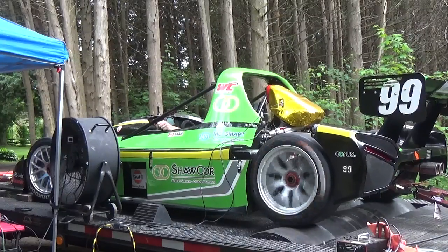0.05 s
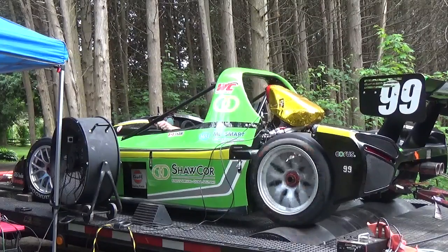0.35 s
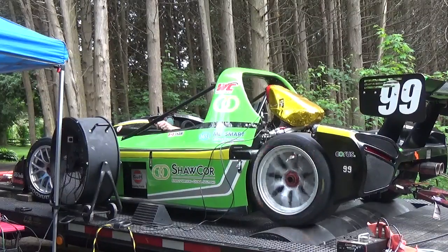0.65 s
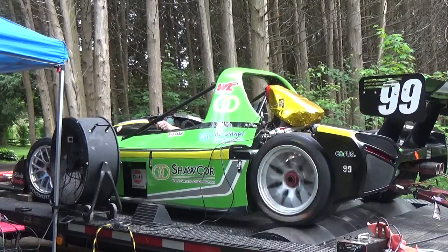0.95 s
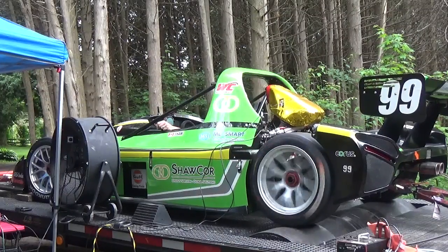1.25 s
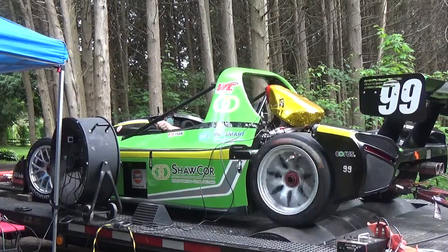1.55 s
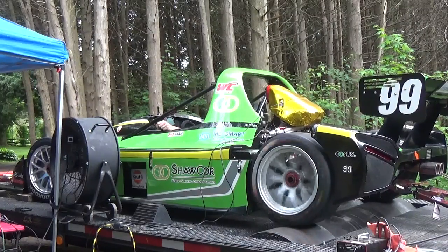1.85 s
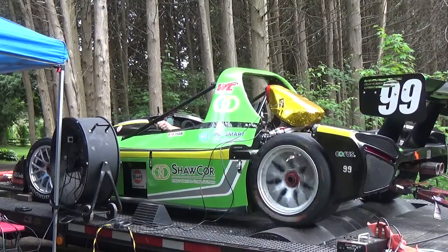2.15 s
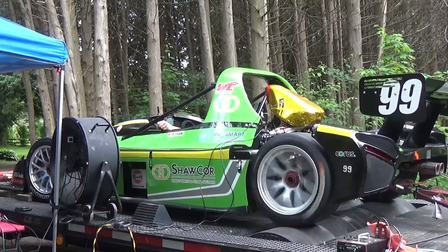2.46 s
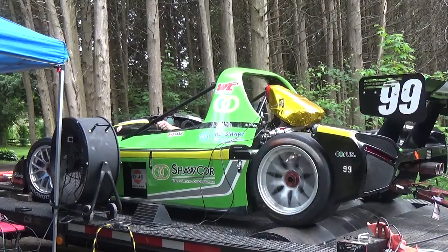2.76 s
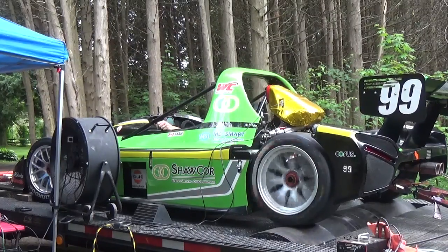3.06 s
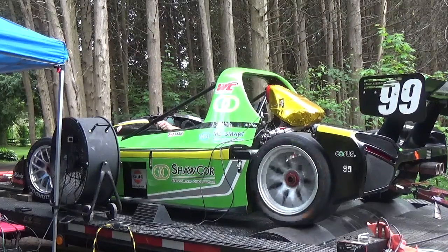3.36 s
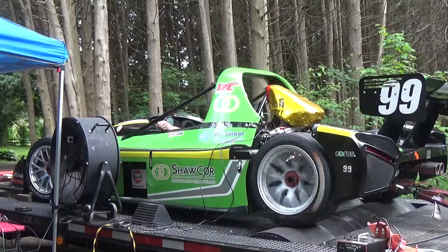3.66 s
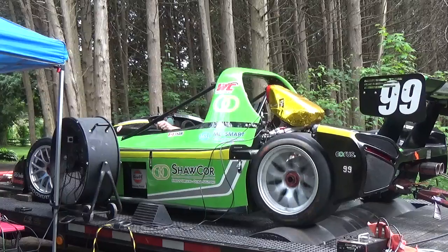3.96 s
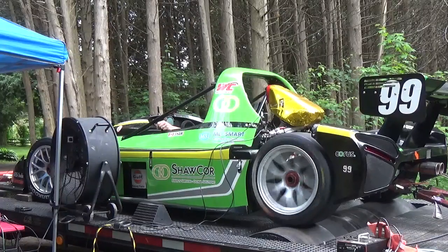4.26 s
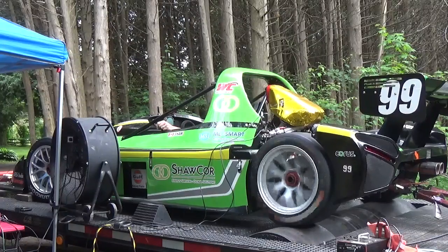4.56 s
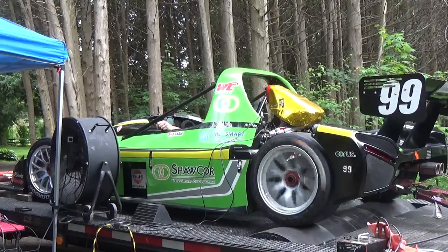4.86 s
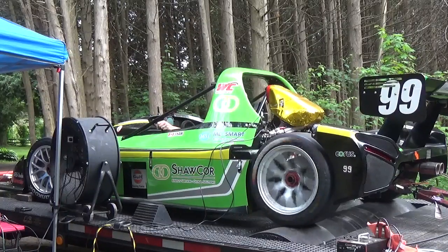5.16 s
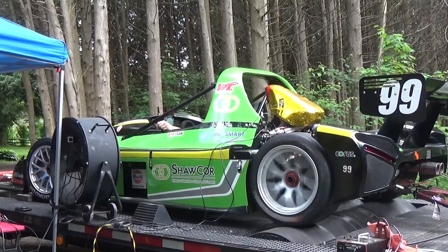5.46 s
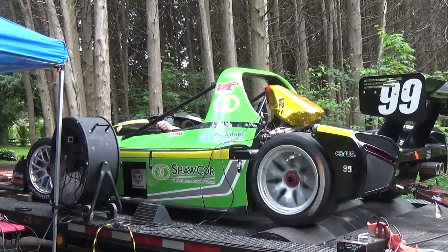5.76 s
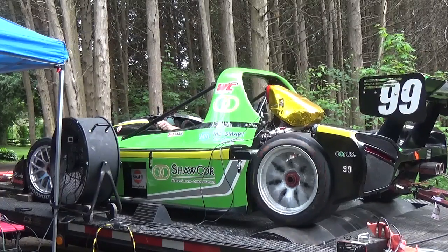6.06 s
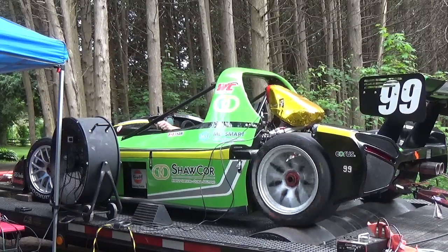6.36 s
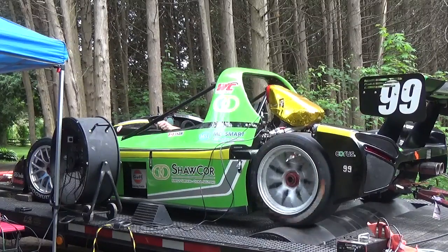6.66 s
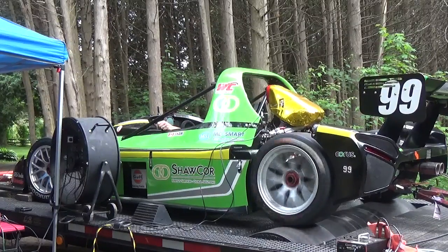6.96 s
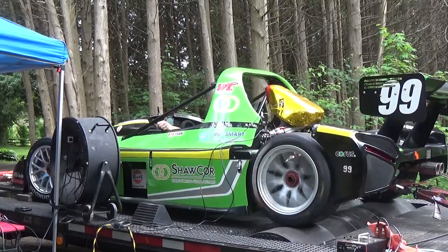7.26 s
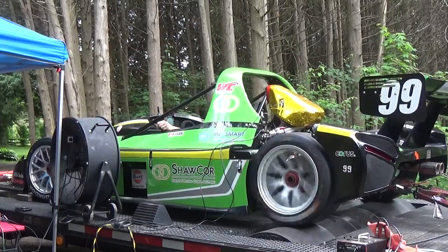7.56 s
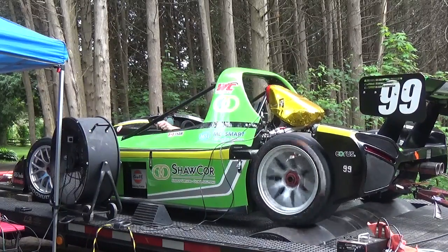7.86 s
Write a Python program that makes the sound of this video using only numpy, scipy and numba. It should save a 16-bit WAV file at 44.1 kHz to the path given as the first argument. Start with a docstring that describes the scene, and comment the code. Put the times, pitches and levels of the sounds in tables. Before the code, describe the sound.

A four-cylinder race car engine runs at high revs on dynamometer rollers outdoors, close to a stereo microphone, with very little echo. It is already loud at the start and keeps going for the whole eight seconds. The exhaust is a strong midrange drone with a rough rasp and a fast, uneven throb of about ten pulses a second. Its pitch stays almost constant, creeping up only slightly. Between about 1 and 3.5 seconds the note stumbles several times in tiny, split-second dips, then it carries on and catches once more at about 7.4 seconds. Much quieter layers run underneath throughout: valve clatter, tyres hissing on the rollers, thin gear whine and the low rumble of air from a cooling fan. The clatter and whine grow a little toward the end, with one faint high whine pulsing from around 6 seconds.

```python
"""Outdoors among trees, a stereo microphone close to a four-cylinder race car on the rollers of a dyno.
From the start a cooling fan blows, tyres hiss, gears whine and gas rasps with each firing; the driveline
shudders about ten times a second, swinging the exhaust orders across the silencer's resonances.
Creeping up towards 6000 rpm, the engine stumbles through a flat spot from about 1 to 3.5 s.
It levels off near 6100 rpm, where one gear mesh sings out, and stumbles once more at 7.4 s."""
import sys
import numpy as np
from scipy import signal
from scipy.fft import rfft, irfft
from scipy.io import wavfile
from scipy.ndimage import uniform_filter1d, minimum_filter1d
from numba import njit

SR = 44100
rng = np.random.default_rng(int(sys.argv[2]) if len(sys.argv) > 2 else 0)


def transcribe(signal):
    """Save signal, clipped to [-1, 1], as a 16-bit WAV file at the path in sys.argv[1]."""
    frames = np.atleast_2d(signal).T
    limited = np.clip(frames, -1, 1)
    pcm = np.round(limited * 32767).astype(np.int16)
    wavfile.write(sys.argv[1], SR, pcm)


N = 353241

# Engine speeds are in four-stroke cycles a second (50 Hz is 6000 rpm); an order is a multiple of that.
START_HZ, CRUISE_HZ, FINAL_HZ = 48.8, 50, 50.98
# weak burns let the exhaust note drop out: (time [s], dip of the upper orders [dB], half length [s])
STUMBLES = [(1.087, -5, 0.0055), (1.509, -8, 0.011), (1.643, -11, 0.018), (2.138, -18, .007),
            (2.313, -6, .02), (3.319, -10.5, 0.014), (3.462, -28, 0.0082), (7.4, -8, .019)]


def undb(db):
    """Decibels to gain."""
    return 10 ** (np.asarray(db) / 20)


def level(x, db):
    """Scale to an rms level."""
    return x * undb(db) / np.sqrt(np.mean(x ** 2))


def over_bins(points):
    """Join (Hz, value) points on a log-frequency axis, one value per Fourier bin."""
    hz, value = np.transpose(points)
    return np.interp(np.log(np.arange(N // 2 + 1) * SR / N + 1), np.log(hz), value)


def colour(x, points):
    """Filter by a spectrum of (Hz, dB) points."""
    return irfft(rfft(x) * undb(over_bins(points)), N)


def walk(rate_hz):
    """Random wander with a new value 'rate_hz' times a second; rms about 1.4."""
    steps = rng.standard_normal(4096)
    return 1.726 * np.interp(np.arange(N) / SR * rate_hz, np.arange(len(steps)), steps)


def air(side_db):
    """Stereo white noise: a common part and a weaker opposite part."""
    mid, side = rng.standard_normal((2, N))
    return mid + undb(side_db) * side * np.array([[1], [-1]])


def bump(centre_s, half_s):
    """A bell of height 1 in time."""
    return np.exp(-((np.arange(N) / SR - centre_s) / half_s) ** 2)


def echoes(x, wet_db, t60_s, first_s):
    """Scattered reflections, different on each side of the microphone."""
    t = np.arange(SR // 2) / SR
    tail = rng.standard_normal((2, len(t))) * np.exp(-np.log(1000) * t / t60_s) * (t > first_s)
    tail = tail / np.sqrt(np.sum(tail ** 2, axis=1, keepdims=True))
    return undb(wet_db) * signal.fftconvolve(x[None], tail, axes=1)[:, :N]


def fan(rumble_db=-44, gust_db=2):
    """Air from the cooling fan buffets the car and the trailer deck."""
    # rumble of deck and draught: (frequency [Hz], relative level [dB])
    rumble_spectrum = [(15, -24), (30, -14), (50, 0), (80, 0), (160, -1), (400, -8), (1500, -30)]
    draught = air(side_db=-4) * undb(gust_db * walk(30))
    return level(colour(draught, rumble_spectrum), rumble_db)


def tyres(cycles, hiss_db=-43.5, wheel_db=0.1, crank_db=0.6, drift_db=0.5, grain_db=1.0):
    """Tyres hiss on the steel rollers, swelling once a wheel turn and with the pull of the crank."""
    # rubber on steel: (frequency [Hz], relative level [dB])
    hiss_spectrum = [(2000, 2.5), (5000, -5.5), (6500, -12.5), (8000, -2.5), (9700, 0), (10400, -2),
                     (11000, -13.5)]
    wheel_turns = .22 * cycles
    swell_db = wheel_db * np.sin(2 * np.pi * wheel_turns) + crank_db * np.cos(4 * np.pi * cycles)
    flicker_db = drift_db * walk(25) + grain_db * walk(300)
    return level(colour(air(side_db=-25) * undb(swell_db + flicker_db), hiss_spectrum), hiss_db)


def gears(mean_hz, swing_hz, trim_db=-0.5, load_db_per_hz=1.5, flicker_db=2.0, slack_cycles=0.0017):
    """Teeth mesh at multiples of the mean speed; slack smears the higher whines most."""
    # gear and chain whines: (order [per cycle], level at cruise before the trim [dB])
    whines = [(51, -62), (55.4, -60.5), (90.2, -65), (141, -71), (152.2, -68), (160, -67.5), (190.3, -63.5),
              (193, -65), (203.6, -64.5)]
    meshes = [(order, db + trim_db + load_db_per_hz * (mean_hz - CRUISE_HZ)) for order, db in whines]
    # one mesh sings out near the final speed and throbs with the shudder
    singing_order, final_db, fall_db_per_hz, throb_db = 67.2, -56, 13.5, 14.5
    singing_db = final_db - fall_db_per_hz * (FINAL_HZ - mean_hz) + throb_db * np.tanh(swing_hz)
    cycles = np.cumsum(mean_hz) / SR
    out = 0
    for order, db in meshes + [(singing_order, singing_db)]:
        size = np.sqrt(2) * undb(db + flicker_db * walk(22))
        out = out + size * np.sin(2 * np.pi * order * (cycles + slack_cycles * walk(70)))
    return out


def puffs(cycles, decay_firings, scatter_db):
    """A burst at each of the four firings of a cycle, each with its own strength."""
    firing, since = np.divmod(4 * cycles, 1)
    strength = undb(scatter_db * rng.standard_normal(4096))
    return strength[firing.astype(int)] * np.exp(-since / decay_firings)


def rasp(cycles, uneven, gas_db=-32):
    """Gas tears out of the pipe at every firing."""
    # turbulent gas in the pipe: (frequency [Hz], relative level [dB])
    gas_spectrum = [(60, -27), (130, -10.5), (250, -13.5), (370, -17), (440, -3.5), (485, -2), (530, -22),
                    (590, -19.5), (645, -9.5), (720, -17), (845, -12), (920, -15.5), (1120, -18.5),
                    (1400, -25.5), (3000, -42.5)]
    bursts = air(side_db=-8) * puffs(cycles, decay_firings=0.89, scatter_db=-0.5)
    return level(colour(bursts, gas_spectrum) * uneven, gas_db)


def valve_train(mean_hz, cycles, clatter_db=-40.5, load_db_per_hz=2.0):
    """The valve train clatters harder as the speed climbs."""
    # valve and induction clatter: (frequency [Hz], relative level [dB])
    clatter_spectrum = [(500, -17.5), (1100, -0.5), (1800, 0), (2350, -5), (2750, -3.5), (2950, -7),
                        (4500, -11), (6000, -16), (11000, -18.5)]
    bursts = air(side_db=-12) * puffs(cycles, decay_firings=1.7, scatter_db=0.8)
    load = undb(load_db_per_hz * (mean_hz - CRUISE_HZ))
    return level(colour(bursts, clatter_spectrum) * load, clatter_db)


def mean_speed(levels_off_s=9.8):
    """The engine gains speed against the rollers, ever more slowly."""
    still_to_go = np.maximum(1 - np.arange(N) / SR / levels_off_s, 0)
    return FINAL_HZ - (FINAL_HZ - START_HZ) * still_to_go ** 2


def flat_spot(mean_hz, centre_hz=49.7, half_width_hz=0.5):
    """How deep the engine is in the band of speed where it pulls unevenly, 0-1."""
    return np.exp(-((mean_hz - centre_hz) / half_width_hz) ** 2)


def shudder(mean_hz, rate_hz=10.75, width_hz=4.3, base_hz=0.36, flat_spot_hz=0.32, wander_hz=0.1297):
    """Swing of the speed about its mean, Hz: the driveline is a spring that random torque keeps ringing."""
    detune = (np.arange(N // 2 + 1) * SR / N - rate_hz) / (width_hz / 2)
    torque = rng.standard_normal(N)
    spring = level(irfft(rfft(torque) / (1 + detune ** 4), N), 0)
    stiffened = level(np.tanh(spring), 0)  # the spring resists wide swings
    depth_hz = base_hz + flat_spot_hz * flat_spot(mean_hz)
    return stiffened * depth_hz + wander_hz * walk(35)


def unevenness(loaded_db=1.63, start_db=-4, settle_s=0.77, stumble_db=3.0, upset_s=0.035):
    """How unevenly the cylinders burn, as a gain: smooth at first, roughest around a stumble."""
    upset = np.max([bump(s, upset_s) for s, _, _ in STUMBLES], axis=0)
    settling = np.exp(-np.arange(N) / SR / settle_s)
    return undb(loaded_db + start_db * settling + stumble_db * upset)


def dropouts(mean_hz, weak_chance=0.035, weak_db=-12.5, weak_half_s=0.0045):
    """Dips of the upper exhaust orders, dB: the stumbles, and stray weak burns in the flat spot."""
    starts = np.arange(0, N, SR // CRUISE_HZ)
    missed = rng.random(len(starts)) < weak_chance * flat_spot(mean_hz[starts])
    weak_burns = [(s, weak_db, weak_half_s) for s in starts[missed] / SR]
    return np.min([db * bump(s, half_s) for s, db, half_s in STUMBLES + weak_burns], axis=0)


def boom(swing_hz, uneven, resonance_hz=158, boom_db=-43.0, surge_db=4):
    """Uneven burns ring the lowest pipe resonance, in throbs that follow the swings of speed."""
    excitation = walk(22) + 1j * walk(22)
    ring = np.real(excitation * np.exp(2j * np.pi * resonance_hz * np.arange(N) / SR))
    return ring * uneven * undb(boom_db + surge_db * np.tanh(swing_hz))


def drone(mean_hz, cycles, waver_db=.6):
    """Clean low tones at the crank rate and the firing rate, each fading past a knee of speed."""
    # low tones: (order [per cycle], level [dB], knee above cruise [Hz], slope past the knee [dB/Hz])
    partials = [(2, -32.5, 0.45, -12.5), (4, -29, -0.92, -5.9)]
    tones = []
    for order, db, knee_hz, slope in partials:
        past_knee_hz = np.maximum(mean_hz - CRUISE_HZ - knee_hz, 0)
        tones.append(undb(db + slope * past_knee_hz) * np.sin(2 * np.pi * order * cycles))
    crank, firing = tones
    return np.sqrt(2) * (crank - firing) * undb(waver_db * walk(20))


def exhaust(speed_hz, cycles, uneven, dip_db, rough_db=-50, rough_share=0.096, rough_hz=50):
    """Orders ride the flanks of the pipe's resonances; uneven burns shake the size and timing of each."""
    # exhaust note: (order [per cycle], level at cruise [dB], slope with engine speed [dB/Hz])
    orders = [(3, -38.5, 4), (5, -60, -11.5), (6, -21, 4), (7, -42.5, 3), (8, -34, 5), (9, -23, 4),
              (10, -15, -1.56), (11, -40, 0), (12, -45, 0), (13, -42.5, -2.5), (15, -54.5, -6),
              (16, -48.5, 1), (17, -48, 4.5), (19, -53, -5), (20, -58.5, -6.5), (22, -52.5, 2)]
    shaken_cycles = cycles + .0015 * uneven * walk(70)
    out = 0
    for order, db, slope in orders:
        # a stumble starves the ringing pipe; the lower orders carry on, and stay cleaner
        exposure = min(order / 10, 1) ** 2
        size = undb(db + slope * (speed_hz - CRUISE_HZ) + dip_db * exposure)
        roughness = min(undb(rough_db), 0.14 * undb(db)) + rough_share * undb(db)
        burn = size + exposure * uneven * roughness * (walk(rough_hz) + 1j * walk(rough_hz))
        # the silencer delays each order differently, smearing the pulses into a drone
        lag_rad = 1.87 * order ** 2
        phase = 2 * np.pi * order * shaken_cycles - lag_rad
        out = out + np.sqrt(2) * np.real(burn * np.exp(1j * phase))
    return out


def scene(throb_share=0.69, note_pan_db=0.23, pan_db_per_hz=-0.96, machinery_pan_db=-1.2):
    """The car from the microphone's position: one crankshaft drives every layer but the fan."""
    mean_hz, uneven = mean_speed(), unevenness()
    swing_hz = shudder(mean_hz)
    cycles = np.cumsum(mean_hz + swing_hz) / SR
    pipe_speed_hz = mean_hz + throb_share * swing_hz  # the resonances follow part of the shudder
    note = exhaust(pipe_speed_hz, cycles, uneven, dropouts(mean_hz))
    note = note + drone(mean_hz, cycles) + boom(swing_hz, uneven)
    machinery = rasp(cycles, uneven) + valve_train(mean_hz, cycles)
    machinery = machinery + tyres(cycles) + gears(mean_hz, swing_hz)
    trees = echoes(note, wet_db=-24.5, t60_s=0.23, first_s=0.015)
    bodywork = echoes(machinery.mean(axis=0), wet_db=-9, t60_s=0.053, first_s=0.0022)
    # the microphone stands in a pattern of reflections that shifts with the pitch of the note
    pan_db = note_pan_db + pan_db_per_hz * (mean_hz - CRUISE_HZ)
    left_right = np.array([[.5], [-.5]])
    direct = note * undb(left_right * pan_db) + machinery * undb(left_right * machinery_pan_db)
    return direct + trees + bodywork + fan()


def record(dry, drive_db=2.5, ceiling_db=-5.5, release_s=0.013, top_hz=11000):
    """A stereo microphone whose left port leads, a fast limiter on the drone, and a steep treble cut."""
    # phase between the microphone's two ports: (frequency [Hz], lead of the left [rad])
    port_lead = [(20, 0.41), (100, .55), (200, 1.07), (300, 0.77), (410, 0.33), (488, 0.6), (503, 0.22),
                 (520, .2), (600, .5), (1100, 0.68), (1700, 0.45), (11000, 0.04)]
    phase = np.array([[.5], [-.5]]) * over_bins(port_lead)
    ports = undb(drive_db) * irfft(rfft(dry) * np.exp(1j * phase), N)
    peak = follow(np.abs(ports).max(axis=0), 1.0, 1 / (release_s * SR))
    gain = np.minimum(1, undb(ceiling_db) / (peak + 1e-9))
    # the limiter looks a little ahead and eases into each peak
    gain = uniform_filter1d(minimum_filter1d(gain, size=89), size=89)
    treble_cut = signal.ellip(12, .2, 80, top_hz, fs=SR, output="sos")
    return signal.sosfilt(treble_cut, ports * gain)


@njit
def follow(x, attack, release):
    """The limiter's peak follower: rises fast, falls back slowly."""
    out, held = np.empty(len(x)), 0.
    for i in range(len(x)):
        held += (x[i] - held) * (attack if x[i] > held else release)
        out[i] = held
    return out


dry = scene()
out = record(dry)
transcribe(out)
```